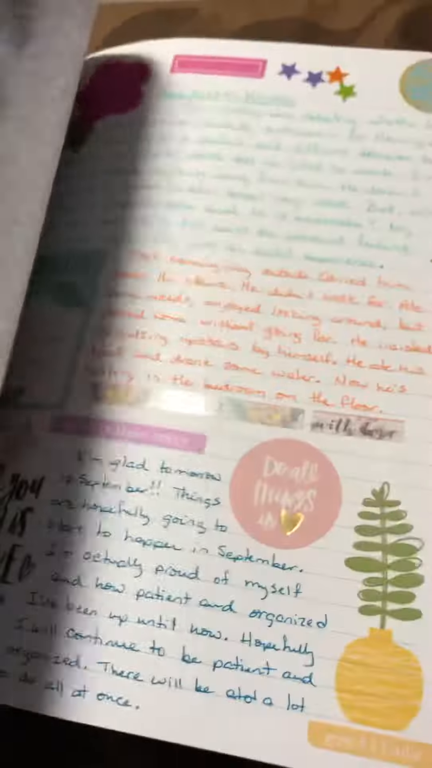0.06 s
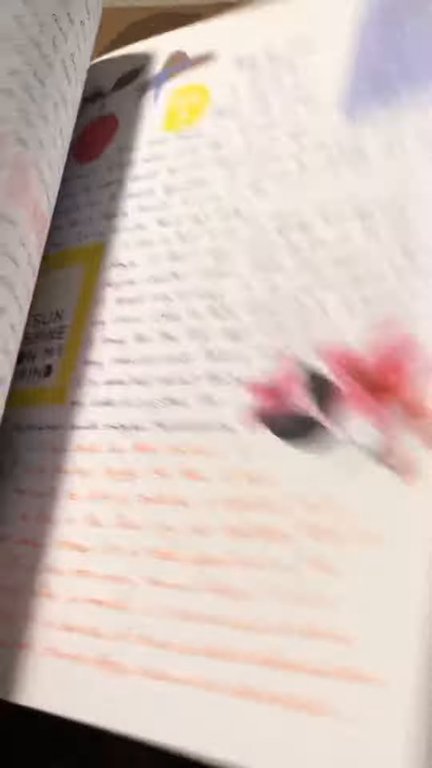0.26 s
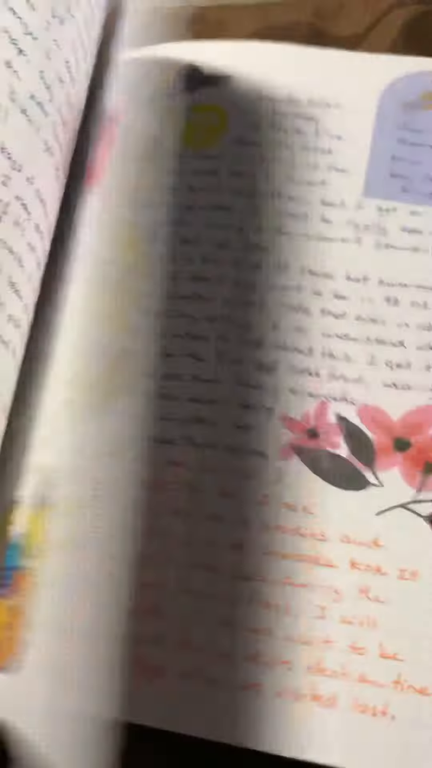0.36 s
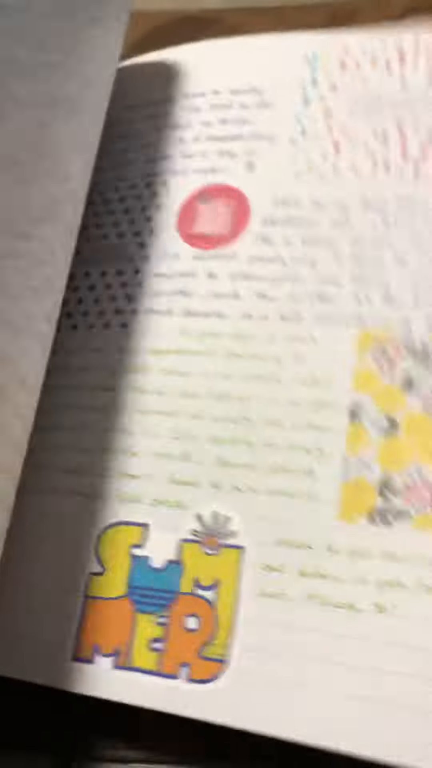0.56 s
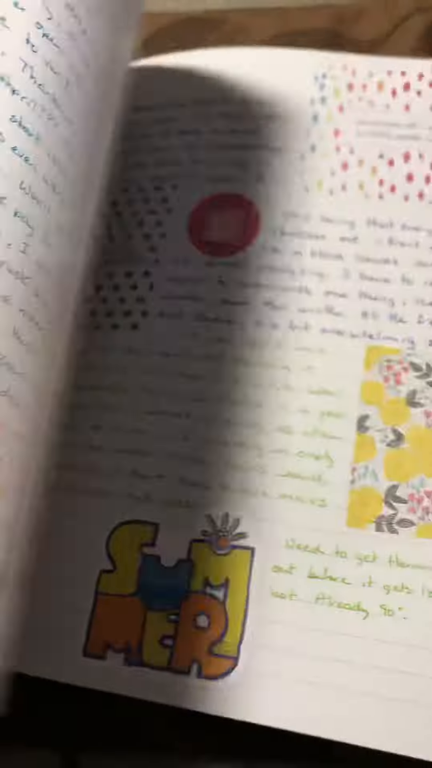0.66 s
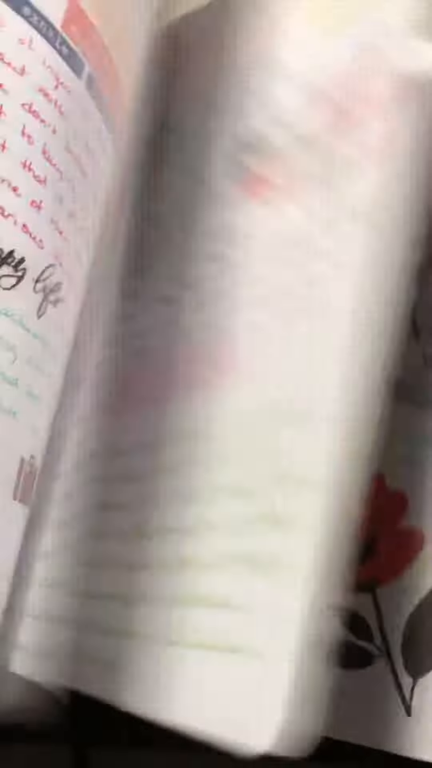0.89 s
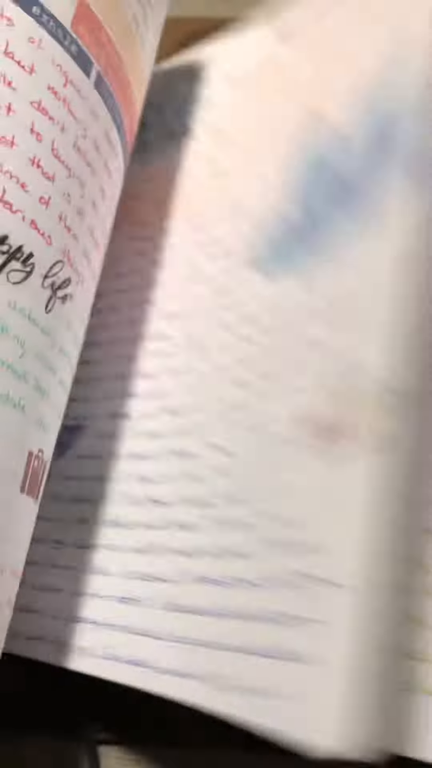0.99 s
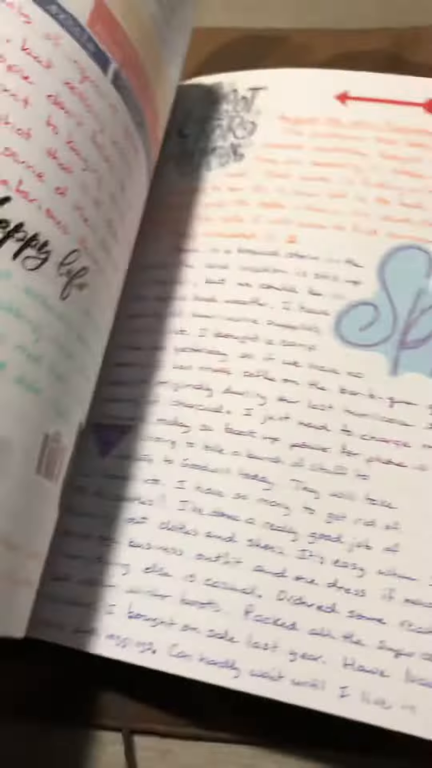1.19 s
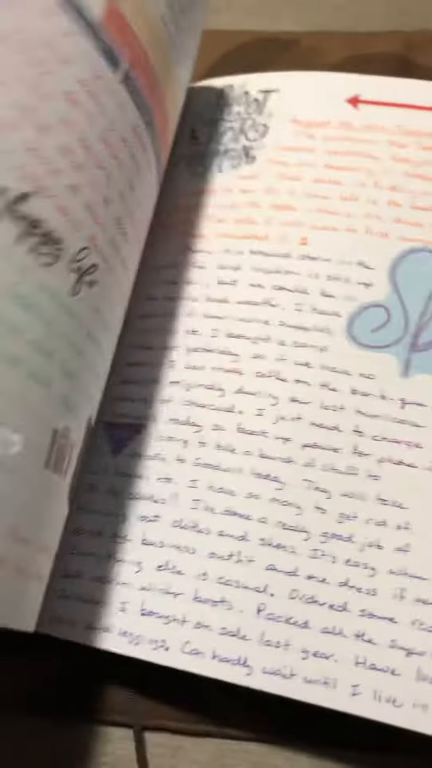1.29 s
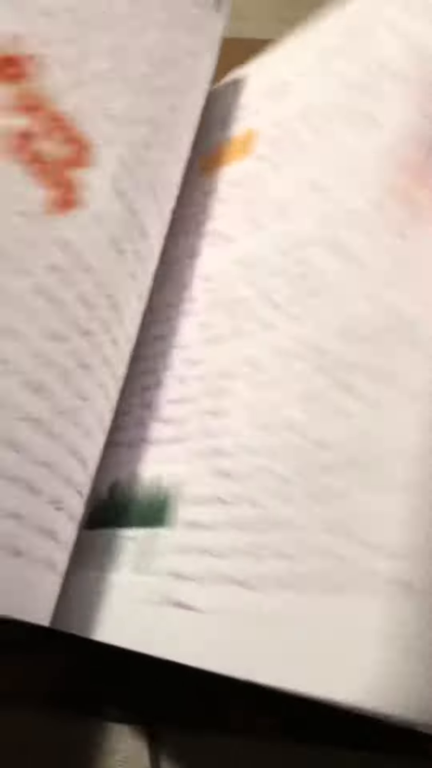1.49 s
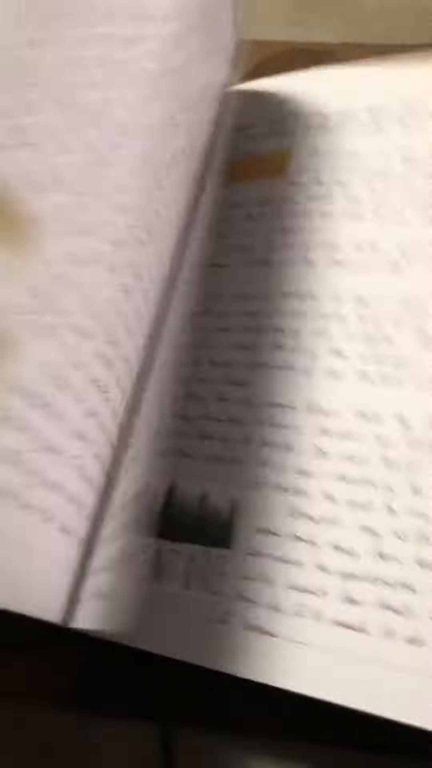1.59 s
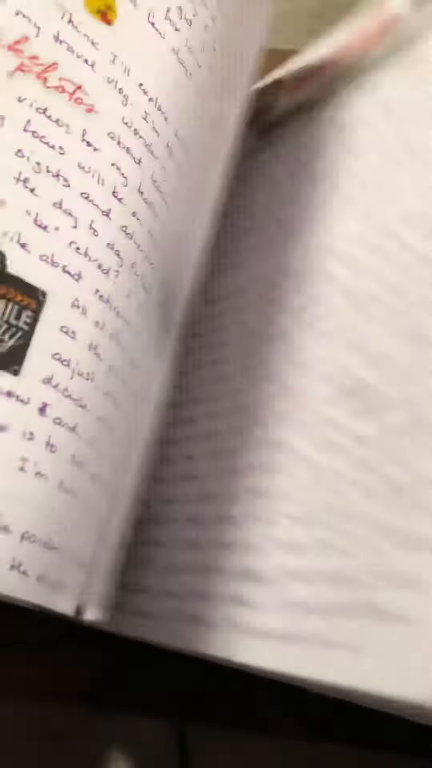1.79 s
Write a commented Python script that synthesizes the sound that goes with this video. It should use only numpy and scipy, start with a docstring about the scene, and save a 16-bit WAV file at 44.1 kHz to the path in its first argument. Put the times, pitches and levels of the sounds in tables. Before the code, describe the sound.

Pages of a thick journal flicked over quickly in short, crisp, close snaps.

```python
"""Pages of a thick journal are flicked over close to the microphone in a small, quiet room.
Each page edge crackles off the thumb and snaps free; a bending wave runs through the sheet, treble first, bass last.
Between the snaps the sheets tick, slide on each other and settle with soft, hollow brushes."""
import sys
import numpy as np
from scipy import signal
from scipy.fft import rfft, irfft, next_fast_len
from scipy.io import wavfile
from scipy.ndimage import uniform_filter1d

SR = 44100
rng = np.random.default_rng(int(sys.argv[2]) if len(sys.argv) > 2 else 0)


def dump(signal):
    """Clip the signal to [-1, 1] and save it as 16-bit WAV at the path in sys.argv[1]."""
    limited = np.clip(np.atleast_2d(signal).T, -1, 1)
    pcm = np.round(limited * 32767).astype(np.int16)
    wavfile.write(sys.argv[1], SR, pcm)


N = 81585

# snaps of a page: (release s, crackle before it s, crackle dB, sizzle over it dB, sheet body dB, flap dB,
#                   resonances of the bent sheet [(Hz, dB over the crackle), ..])
SNAPS = [(0.2072, 0.003, -6.5, -7.5, -8.5, 5, [(1650, 7), (2850, 5), (6350, 11), (8800, 10)]),
         (.3440, 0.00062, -30, 7, -13, -9.5, [(1430, 30)]),
         (0.4488, 0.0019, -13.5, -7, -12, 0, [(3450, 13.5), (5200, 8), (9800, 8)]),
         (0.6356, 0.0013, -16, -1.5, -11, -1.5, [(3400, 9), (6000, 5)]),
         (.7550, 0.0015, -7.5, -2, -9.5, -2, [(1600, 5), (2680, 7), (8400, 6)]),
         (0.8101, 0.00053, -13, 8, -15.5, -11, [(4800, 5)]),
         (0.8234, .0002, -7, 6.5, -4, -2.5, [(7800, 5.5), (11600, 9.5)]),
         (.8440, 0.00012, -12, 0, -14, -21, [(6940, 2.5)]),
         (1.1654, 0.0005, -27, -3.5, -26.5, -5, [(14800, 20)]),
         (1.211, 0.001197, -15.5, -3.5, -11.5, -12, [(1600, 18.5), (2900, 17.5), (3500, 12), (7300, 8.5)]),
         (1.2889, 0.0002, -20, -3, -15.5, -32, [(2460, 7.5)]),
         (1.386, 0.00084, -19, -1, -9.5, -9.5, [(1550, 14)]),
         (1.4773, 0.0017, -17, -2, -15.5, -2.5, [(2200, 13), (3300, 15)]),
         (1.5832, .0018, -13, -3.5, -22, -5, [(1680, 11.5), (2600, 13), (10000, 10.5)])]
# light ticks of page edges: (s, dB)
TICKS = [(0.429, -29), (0.438, -24.5), (.647, -24.5), (.715, -30.5), (.745, -26),
         (0.7516, -17), (0.7592, -23), (.778, -23), (0.827, -24), (1.1606, -17), (1.2009, -22.5),
         (1.3814, -17.5), (1.4247, -33), (1.470, -25), (1.4882, -21), (1.573, -22), (1.5803, -12.5), (1.747, -33), (1.7955, -26)]
# a sheet slides on its neighbour: (start s, length s, rasp dB, hiss dB)
SLIDES = [(0.121, 0.056, -73, -70.5), (0.311, 0.034, -57.5, -60.5), (0.769, 0.0068, -61, -50), (0.793, 0.063, -82, -57.5),
          (0.888, 0.03, -66, -80), (1.21, 0.034, -71.5, -86), (1.591, 0.016, -65, -72)]
# a sheet settles with a brush, coloured by the air pocket under it: (start s, length s, dB, hollow Hz)
BRUSHES = [(0.229, 0.034, -58, 706), (0.467, 0.031, -63.5, 690), (0.844, 0.035, -49.5, 497), (1.032, 0.028, -54, 775), (1.502, 0.011, -50, 440),
           (1.651, 0.033, -53, 590), (1.741, 0.029, -64, 604)]
CRACKLE = [(300, -64), (900, -58), (1600, -1), (3000, -2.5), (5500, 0.5), (9000, -0.5), (16000, -4.5)]  # (Hz, dB)
BODY = [(150, -23.5), (400, -1.5), (800, -3), (1400, -3.5), (2200, -12.5), (4000, -41.5)]  # (Hz, dB)
FLAP = [(30, -45), (70, -3), (130, -4.5), (200, -2), (400, -8.5), (800, -27)]  # (Hz, dB)
RASP = [(500, -13), (1800, -4), (2700, 11), (3800, -5), (16000, -28)]  # (Hz, dB)
HISS = [(500, 15.5), (2000, 5), (9000, 7.5), (15500, -4)]  # (Hz, dB)
BRUSH = [(60, -10), (170, -4.5), (380, 3.5), (650, -1.5), (1000, -4), (1300, -22), (1900, -25), (6000, -42)]  # (Hz, dB)
FLOOR = [(20, -11), (50, 3.5), (220, -0.5), (450, -6.5), (800, -16.5), (1400, -18.5), (3400, -24), (8000, -28.5), (16000, -34.5)]  # (Hz, dB)
FLOOR_DB = -62.5
HUM = [(57, -73.5), (504, -78.5), (549, -80.5)]  # steady tones in the room: (Hz, dB)
SIZZLE_HZ, RING_Q, RELEASE_SHARE, CRACKLE_FADE_S = 11000, 5.63, 0.52, 0.0003
BEND_S, BEND_LEAD_S = 0.002543, 0.001397  # travel time of a 1 kHz bending wave; head start of the wave on the release
SHEET_T60_S = .016  # fixed
SHEET_DB = -10.5  # the sheet rings on briefly after a crackle
FLUTTER_T60_S, FLUTTER_DB = 0.057, -8.5  # and after a bending wave
RISE_S, FALL_S = 0.0072, 0.0089  # attack and release of slides and brushes
ROOM = [(600, 0.34), (3000, 0.28), (8000, 0.14), (16000, 0.17)]  # (Hz, t60 s)
ROOM_DB = -20
TOP_HZ = 16300  # fixed
HZ = np.fft.rfftfreq(8192, 1 / SR)  # fixed
FLAP_S = 0.003465  # travel time at 1 kHz for the slower flap of the whole sheet
DRAG_S, DRAG_DB = 0.0049, -25.5  # the edge drags on the thumb just before it snaps
CRINKLES_PER_S, CRINKLE_DB = 260, -49  # faint chance crinkles of the bent sheets
TICK = [(400, -9.5), (1500, -6.5), (3500, -2.5), (9000, -6.5), (16000, -6.5)]  # (Hz, dB)
HOLLOW_DB, HOLLOW_Q = 4.5, 3.2  # height and sharpness of the air pocket's resonance


def amp(db):
    return 10 ** (np.asarray(db) / 20)


def unit(x):
    return x / np.sqrt(np.mean(x ** 2) + 1e-20)


def along(points, hz):
    """(Hz, value) points on a log axis."""
    f, v = np.transpose(points)
    return np.interp(np.log(hz + 1), np.log(f + 1), v)


def add(track, s, sound):
    """Mix a sound in at s seconds."""
    i = max(0, round(s * SR))
    track[i:i + len(sound)] += sound[:len(track) - i]


def causal(db):
    """Minimum-phase response with the given gains."""
    c = irfft(db * np.log(10) / 20)
    c[1:len(c) // 2] *= 2
    c[len(c) // 2 + 1:] = 0
    return np.exp(rfft(c))


def noise(spectrum):
    """Coloured noise of rms 1."""
    m = next_fast_len(N + SR // 2)
    return unit(irfft(rfft(rng.standard_normal(m)) * amp(along(spectrum, np.fft.rfftfreq(m, 1 / SR))), m)[:N])


def ringing(t60, db):
    """Response of a direct sound and its dense echoes from the edges of the sheet."""
    t = np.arange(2 * len(HZ) - 2) / SR
    tail = rng.standard_normal(len(t)) * np.exp(-np.log(1000) * t / t60)
    return 1 + amp(db) * rfft(tail / np.linalg.norm(tail))


def crackle(length, t60, db):
    """Spectrum of a run of tiny slips: a first catch, a rough stretch, the release; the sheet rings on for t60."""
    t = np.arange(2 * len(HZ) - 2) / SR
    after = lambda s: (t >= s) * np.exp(-np.abs(t - s) / CRACKLE_FADE_S)
    share = np.clip(RELEASE_SHARE, 0, 1)
    size = .5 * after(0) + 0.4 * (t < length) + after(length)
    slips = rng.standard_normal(len(t)) * size
    slips *= np.sqrt(1 - share) / np.linalg.norm(slips)
    slips[round(length * SR)] += np.sqrt(share)
    z = rfft(slips) * ringing(t60, db)
    return z / np.sqrt(np.abs(uniform_filter1d(np.abs(z) ** 2, size=130)) + 1e-12)


def in_room(x):
    """A sound with its room tail."""
    wet = room(x)
    add(wet, 0, x)
    return wet


def snaps():
    """The edge drags and crackles free, then the sheet's bending wave sweeps down into a flap; its resonances are clearest close up."""
    out = np.zeros(N)
    for s, length, db, sizzle_db, body_db, flap_db, resonances in SNAPS:
        ring = sum(ring_db * hump(HZ, ring_hz, RING_Q) for ring_hz, ring_db in resonances)
        plain = db + along(CRACKLE, HZ) + sizzle_db * (1 - 1 / (1 + (HZ / SIZZLE_HZ) ** 8))
        near, far = causal(plain + ring), causal(plain + ring / 2)
        slips = crackle(length, SHEET_T60_S, SHEET_DB)
        out += amp(DRAG_DB) * signal.fftconvolve(drag(s - length), impulse(far))[:N]
        add(out, s - length, impulse(slips * near))
        add(out, s - length, room(impulse(slips * far)))
        bend = causal(body_db + along(BODY, HZ)) * travel(BEND_S) + causal(flap_db + along(FLAP, HZ)) * travel(FLAP_S)
        add(out, s - BEND_LEAD_S, in_room(impulse(bend * ringing(FLUTTER_T60_S, FLUTTER_DB))))
    return out


def ticks():
    """Page edges catch lightly on the thumb, among fainter crinkles."""
    out = np.zeros(N)
    colour = causal(along(TICK, HZ))
    tick = lambda: in_room(impulse(crackle(0.00018, t60=0.015, db=1) * colour))
    for s, db in TICKS:
        add(out, s, amp(db) * tick())
    crinkles = (rng.random(N) < CRINKLES_PER_S / SR) * rng.standard_normal(N)
    return out + amp(CRINKLE_DB) * signal.fftconvolve(crinkles, tick())[:N]


def swell(s, length):
    """Rise, hold and fall of a stroke."""
    t = np.arange(N) / SR - s
    return np.clip(t / RISE_S, 0, 1) * np.exp(-np.maximum(t - length + FALL_S / 2, 0) / FALL_S)


def rubbing():
    """Sheets slide with a grainy rasp and hiss, and settle with a hollow brush."""
    grain = np.exp(0.37 * unit(uniform_filter1d(rng.standard_normal(N), size=30)))
    rasp, hiss = unit(noise(RASP) * grain), unit(noise(HISS) * grain)
    slides = sum(swell(s, length) * (amp(rasp_db) * rasp + amp(hiss_db) * hiss) for s, length, rasp_db, hiss_db in SLIDES)
    brushes = sum(swell(s, length) * amp(db) * hollow(hollow_hz) for s, length, db, hollow_hz in BRUSHES)
    return in_room(slides + brushes)[:N]


def room_tone():
    """Low rumble, faint hiss and a few weak steady tones."""
    t = np.arange(N) / SR
    hum = sum(amp(db) * unit(np.sin(2 * np.pi * (hz * t + rng.random()))) for hz, db in HUM)
    return amp(FLOOR_DB) * noise(FLOOR) + hum


def impulse(response):
    """A short sound from its spectrum, faded to silence."""
    x = irfft(response)
    return x[:len(x) // 2] * np.clip(np.linspace(2, 0, len(x) // 2), 0, 1)


def travel(s):
    """Delay of a bending wave: s at 1 kHz, growing as 1 / sqrt(frequency)."""
    return np.exp(-4j * np.pi * s * np.sqrt(1000 * HZ))  # fixed


def drag(s):
    """Unit-energy friction noise that swells up to s seconds."""
    t = np.arange(N) / SR - s
    x = rng.standard_normal(N) * (t < 0) * np.exp(-np.abs(t) / DRAG_S)
    return x / np.linalg.norm(x)


def room(x):
    """The short room tail of a sound, the treble dying first."""
    hz, t, z = signal.stft(rng.standard_normal(SR // 2), SR, nperseg=256)
    tail = signal.istft(z * np.exp(-np.log(1000) * t / along(ROOM, hz)[:, None]), SR, nperseg=256)[1]
    return amp(ROOM_DB) * signal.fftconvolve(x, tail / np.linalg.norm(tail))


def hump(hz, centre_hz, q):
    """Bell of height 1 around a resonance."""
    return 1 / (1 + (q * (hz / centre_hz - centre_hz / (hz + 1))) ** 2)


def hollow(centre_hz):
    """Brushing noise of rms 1 through the air pocket under a sheet."""
    colour = causal(along(BRUSH, HZ) + HOLLOW_DB * hump(HZ, centre_hz, HOLLOW_Q))
    return unit(signal.fftconvolve(rng.standard_normal(N), impulse(colour))[:N])


def scene():
    return (snaps() + ticks() + rubbing() + room_tone())[None]


def record(dry):
    """The recorder keeps nothing above its band limit."""
    m = next_fast_len(N + SR // 2)
    gain = 1 / (1 + (np.fft.rfftfreq(m, 1 / SR) / TOP_HZ) ** 100)  # fixed
    return irfft(rfft(dry, m) * gain, m)[..., :N]


dry = scene()
out = record(dry)
dump(out)
```